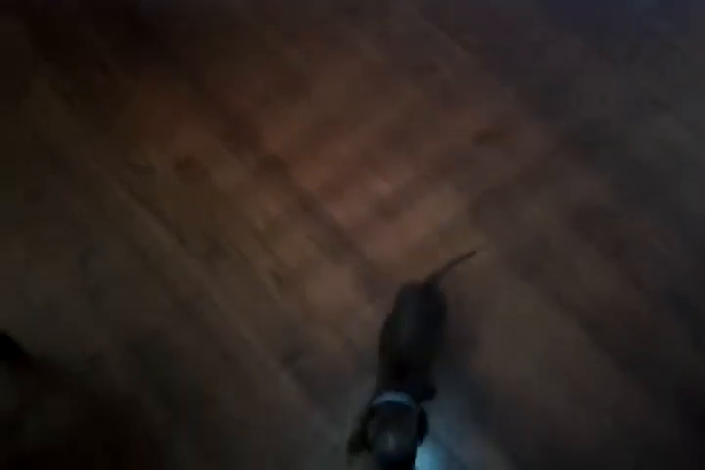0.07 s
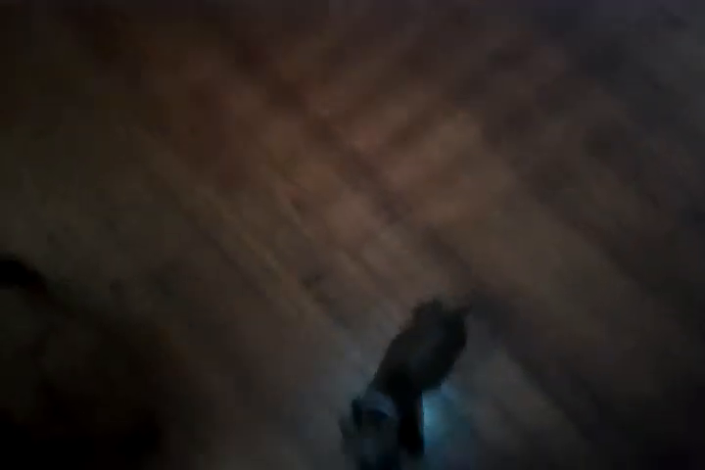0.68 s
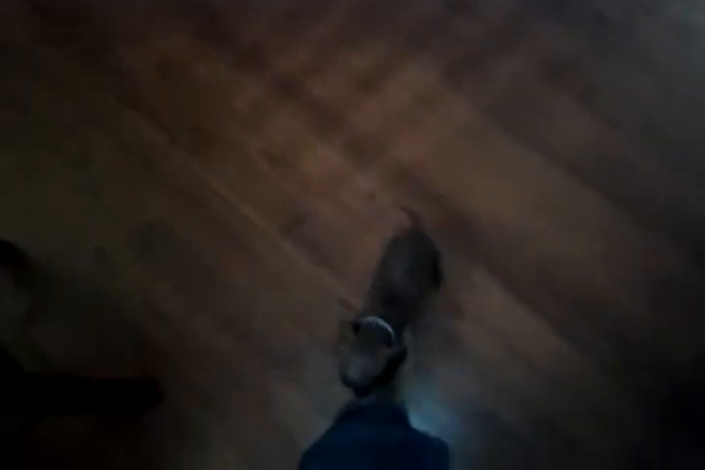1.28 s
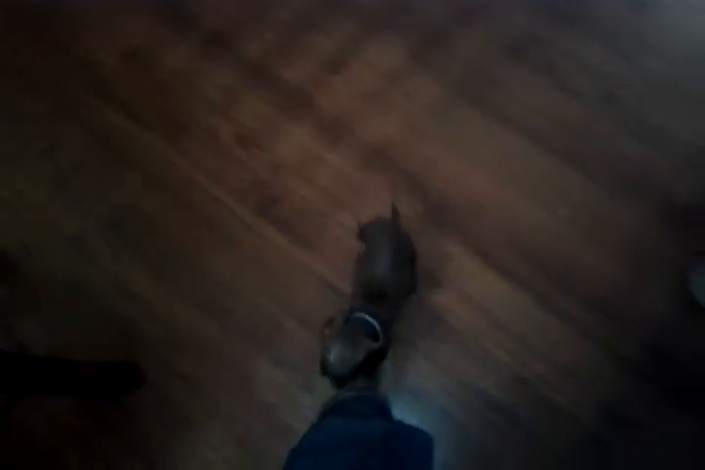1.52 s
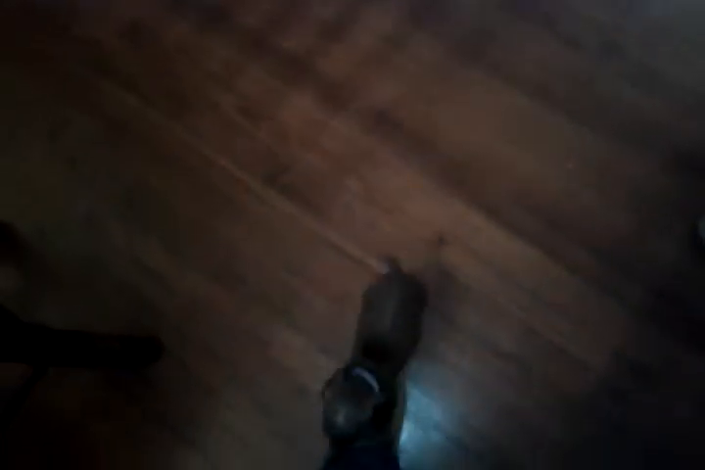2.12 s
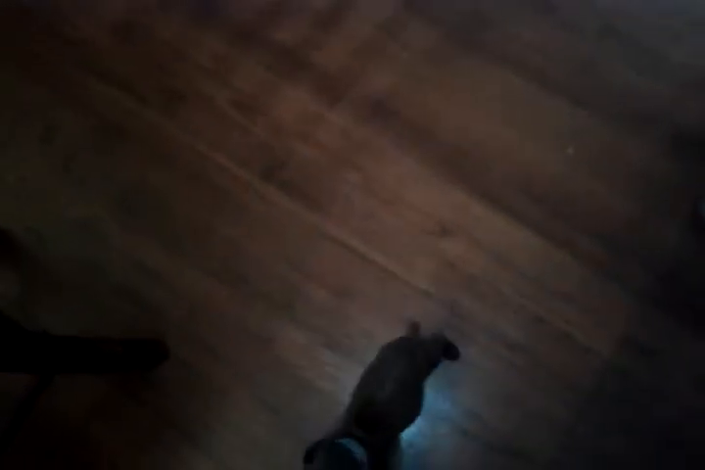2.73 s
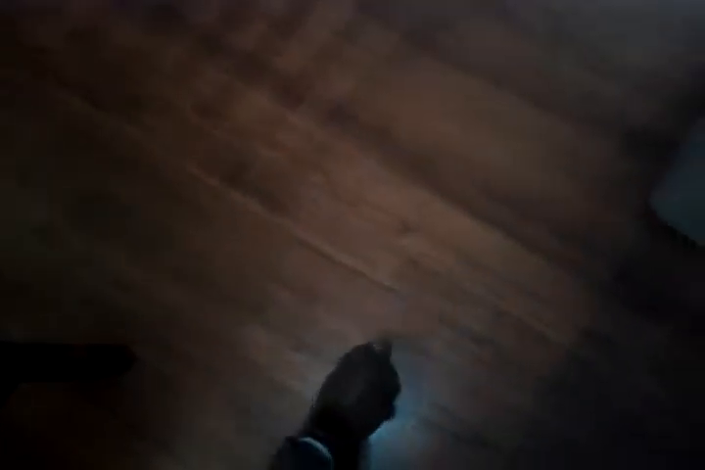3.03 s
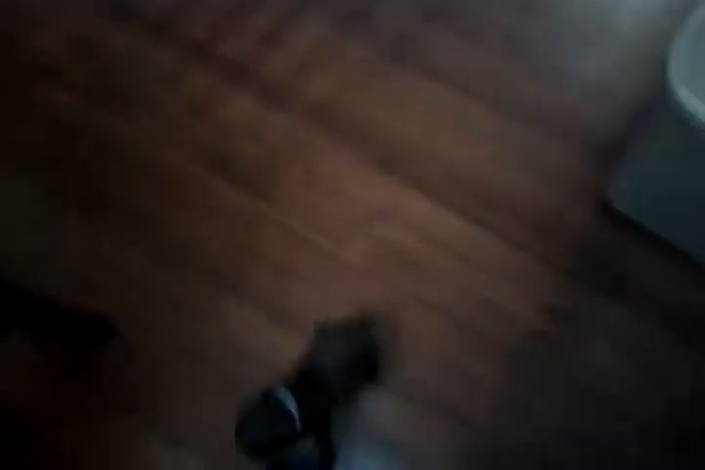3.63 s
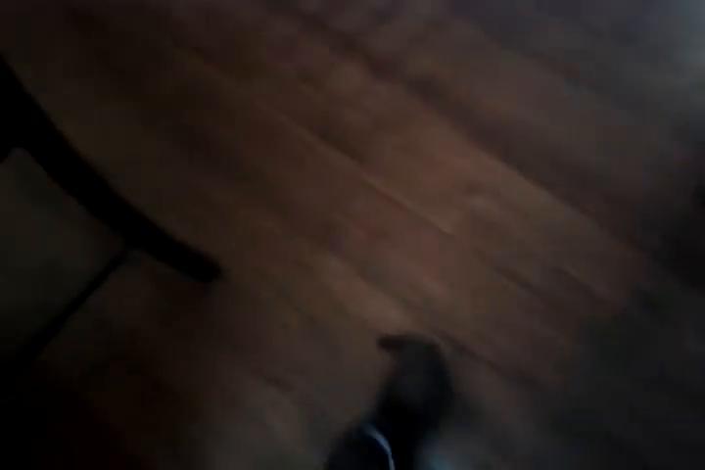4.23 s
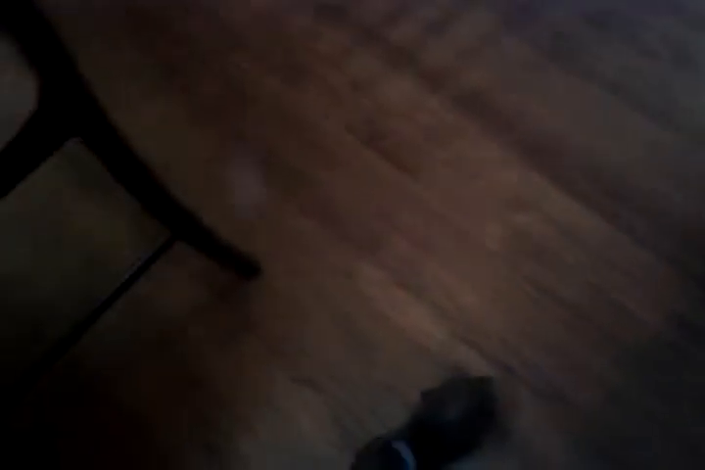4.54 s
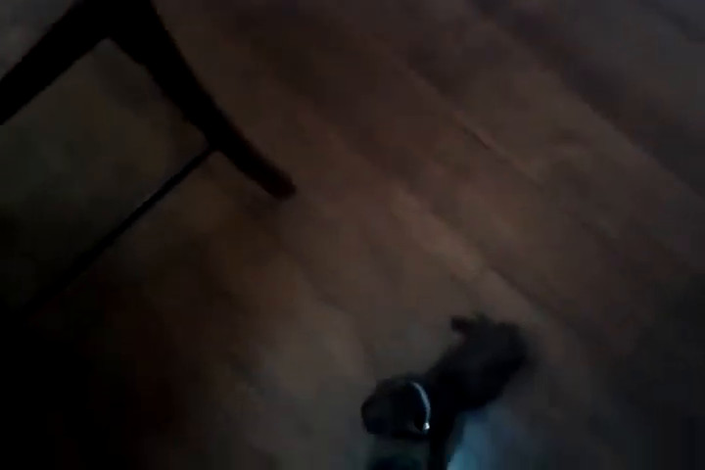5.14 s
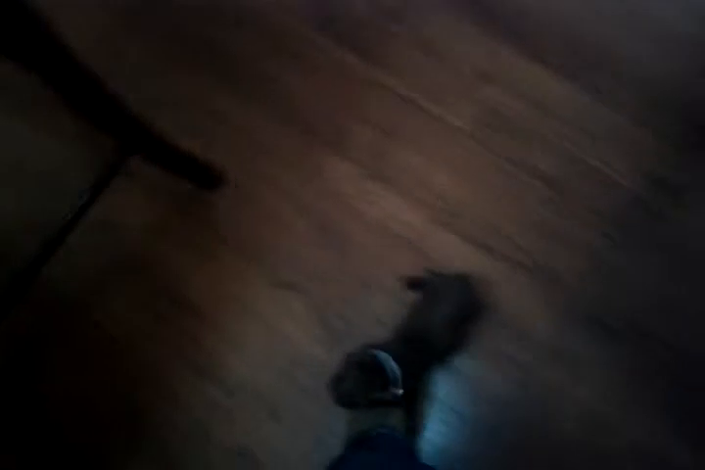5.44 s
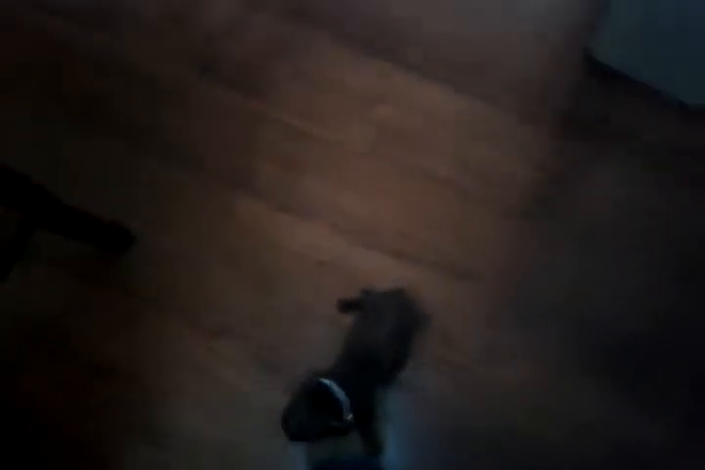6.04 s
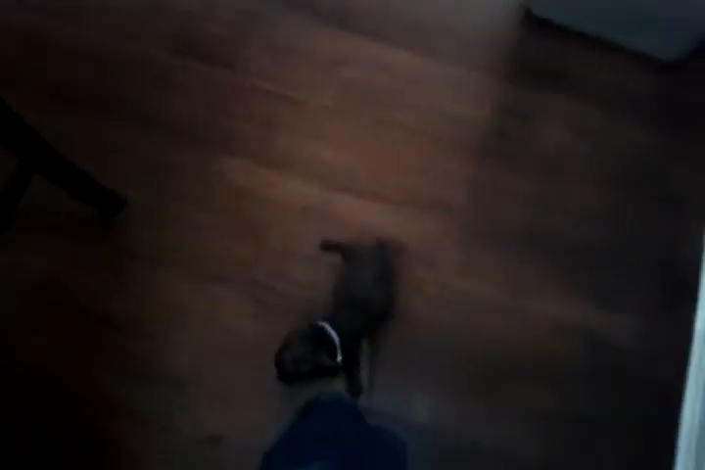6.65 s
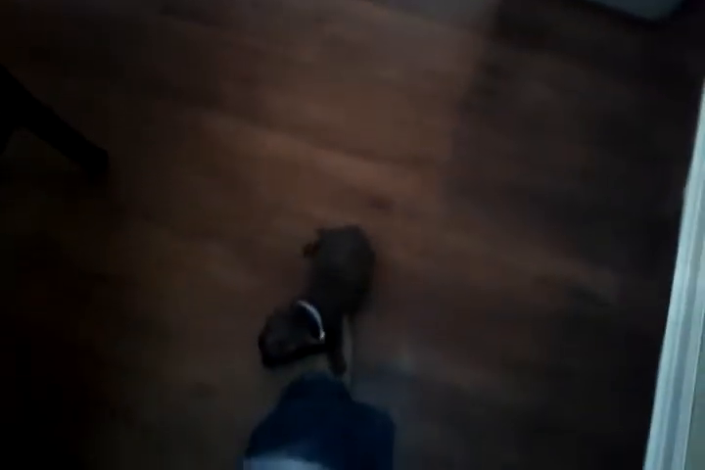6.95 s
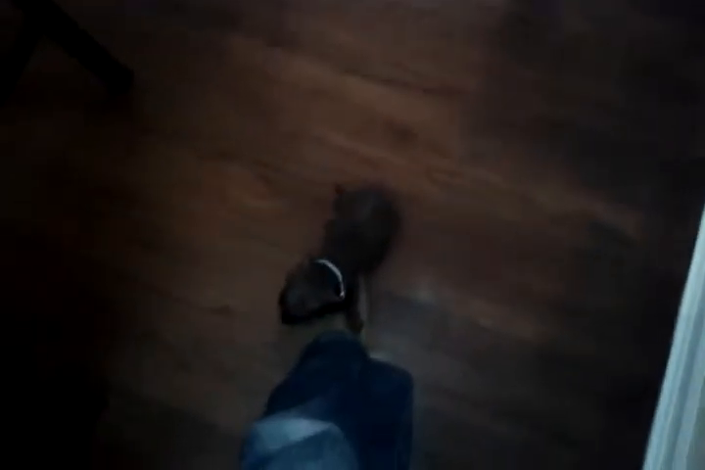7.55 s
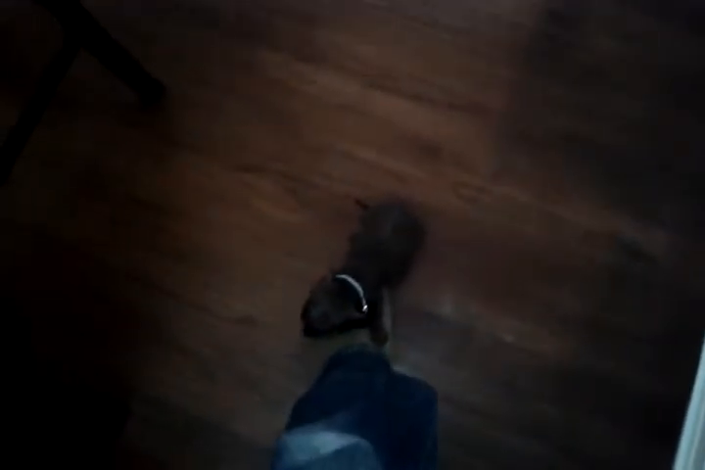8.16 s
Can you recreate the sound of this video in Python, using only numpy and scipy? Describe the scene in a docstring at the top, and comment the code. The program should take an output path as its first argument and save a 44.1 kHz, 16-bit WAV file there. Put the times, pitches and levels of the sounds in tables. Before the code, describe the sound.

A slipper slides over a hardwood floor from the start, dragged in uneven pulls with a puppy hanging on. Each pull is a soft hiss over a low rumble from the boards. A light scuff leads into a hard, chirping one at about 0.9 seconds. Longer slides follow from 1.2 to 2.7 seconds, then another light and hard scuff pair around 3 to 3.2. One sharp knock rings the wood at 3.5. Sliding resumes until about 4.8, then goes faint. The third hard scuff lands near 6 seconds, followed by brief groans of the sole and softer drags until 7.4, with a last small slide near 8.3. Claws and teeth click now and then, most clearly around 1.1, 4.1 and 6.6 seconds. The room is quiet, with a short reverberation, low steady noise and a faint electrical hum.

```python
"""A slipper's sole hisses over a hardwood floor, dragged in stages with a puppy hanging on.
Sliding friction, a crowd of tiny slips, makes the hiss and drives a rumble in the boards.
The sole scuffs hard three times, each after a lighter scuff, and briefly groans or chirps.
Claws and teeth click now and then, and one sharp knock rings the modes of the boards.
The quiet room adds a short reverberation, steady noise and a faint mains hum."""
import sys
import numpy as np
from scipy import signal
from scipy.fft import rfft, irfft, next_fast_len
from scipy.io import wavfile

SR = 44100
rng = np.random.default_rng(int(sys.argv[2]) if len(sys.argv) > 2 else 0)


def put_to_file(sound):
    """Save the sound as 16-bit audio at rate SR, in the file named by the first command-line argument."""
    columns = np.atleast_2d(sound).T  # one column per channel
    safe = np.clip(columns, -1, 1)
    whole_steps = np.round(safe * 32767)
    wavfile.write(sys.argv[1], SR, whole_steps.astype(np.int16))


N = 370440


# Spectra of the sliding sole and of the boards under it.
# Each row: frequency in Hz, relative spectral density in dB.
HISS_SPECTRUM = [(300, -39), (900, -17), (1500, -0.5), (2100, -0.5), (3000, -2), (3750, -2.5), (4400, -5),
                 (5500, -4), (6500, -9), (7400, -10), (9000, -16)]
RUMBLE_SPECTRUM = [(60, -27.5), (150, -6.5), (300, -3), (620, 2), (780, 1.5), (980, 2), (1300, -3),
                   (2000, -21), (5000, -52.5)]

def pull(rise_s, fall_s, rumble_db, sole_hz, width_hz, ring_db, tilt_db):
    """Sliding friction: hiss and rumble grow as powers of the speed, which rises and falls to rest."""
    t = np.arange(0, rise_s + fall_s, 1 / SR)
    arch = np.sin(np.pi / 2 * np.interp(t, [0, rise_s, rise_s + fall_s], [0, 1, 0]))
    waver_db = 0.5 * drift(len(t), rate_hz=7.1)
    speed = arch * amp(waver_db)
    rub = slips(len(t), per_s=16000, spread_db=1.0, judder_db=0.5)
    hiss = unit(colour(rub, HISS_SPECTRUM, tilt_db))
    ring = amp(ring_db) * ringing(len(t), sole_hz, width_hz)
    rumble = amp(rumble_db) * unit(colour(rub, RUMBLE_SPECTRUM))
    return speed ** 0.93 * unit(hiss + ring) + speed ** 0.86 * rumble


# Pulls on the slipper. Each row: fastest moment, rise time and fall time in seconds, hiss level in dB,
# rumble over hiss in dB, the sole's resonance and its width in Hz, ring over hiss in dB,
# treble tilt in dB per octave.
SLIPPER_PULLS = [ (0.04, 0.12, 0.46, -41.5, -12.5, 2750, 1300, -2.5, 1.5),
                 (0.33, 0.12, 0.11, -43, -13.5, 3200, 1690, -1.5, -0.3),
                 (0.85, 0.46, 0.55, -57, -5, 2450, 700, -7, 2.5),
                 (1.56, 0.47, 0.51, -41.5, -10.5, 2450, 750, -4, -0.7),
                 (1.96, 0.32, 0.49, -43.5, -10, 2910, 800, -4.5, -0.2),
                 (2.46, 0.14, 0.26, -46, -5.5, 2240, 900, -4, 0),
                 (2.85, 0.30, 0.43, -60, -5.5, 2260, 800, -4.5, 1.8),
                 (3.38, 0.10, 0.14, -56, -4, 2300, 900, -5, 2.5),
                 (3.78, 0.24, 0.48, -44, -4.5, 2370, 900, -8, -0.8),
                 (4.17, 0.21, 0.13, -48.5, -3, 2340, 900, -5, -0.5),
                 (4.61, 0.32, 0.18, -53, -3, 2280, 800, -4.5, 0.2),
                 (5.62, 1.10, 0.63, -61.5, -6, 2180, 700, -4.5, 3),
                 (6.15, 0.12, 0.3, -56.5, -4.5, 2150, 600, -3.5, 3.5),
                 (6.35, 0.092, 0.24, -45, -5.5, 2170, 700, -0.5, 2),
                 (6.76, 0.22, 0.17, -46.5, -3.5, 2120, 900, -3, 1),
                 (7.08, 0.21, 0.36, -50, -5, 2150, 850, -3, 1.5),
                 (8.38, 0.26, 0.12, -51, -3, 2220, 900, -6, -0.5)]

def slide():
    """Superposition: the pulls add up, one often running into the next."""
    out = np.zeros(N + SR)  # a second of lead-in: the first pull is already under way
    for fastest, rise_s, fall_s, db, *contact in SLIPPER_PULLS:
        add(out, 1 + fastest - rise_s, amp(db) * pull(rise_s, fall_s, *contact))
    return out[SR:]


# Spectra of the sole's edge touching down and of a hard scuff.
# Each row: frequency in Hz, relative spectral density in dB.
EDGE_SPECTRUM = [(60, -12.5), (250, -5.5), (700, -3), (1200, -10), (1750, -6), (2280, 1.5), (3100, -5.5),
                 (3650, -2.5), (4300, -8.5), (5800, -4), (7300, -8), (9000, -11.5)]
SCUFF_SPECTRUM = [(60, -35.5), (150, -12), (300, -8), (800, -3), (1300, -2), (2000, 1.5), (3000, 3),
                  (3700, -2), (4300, -5), (5100, -1.5), (6100, -4.5), (7100, -4), (9000, -13.5)]
# Scuffs of the sole. Each row: touch-down and fastest moment in seconds, drag and peak levels in dB,
# Gaussian half-length in seconds, the sole's resonance in Hz, ring over rub in dB,
# treble tilt in dB per octave.
SOLE_SCUFFS = [ (0.658, 0.685, -57.5, -44, 0.015, 2700, -5.5, -1.5),
               (0.838, 0.92, -41.5, -28.5, 0.017, 2550, -5, 0.5),
               (2.945, 2.992, -53, -46.5, 0.018, 1270, -5.5, -1.5),
               (3.143, 3.225, -40.5, -31, 0.018, 1560, -9, 0.6),
               (5.645, 5.697, -58, -44.5, 0.011, 2150, -0.5, -3.5),
               (5.865, 5.98, -43, -30, 0.018, 2250, 3, -0.8)]

def scuffs():
    """Transient friction: the sole's edge drags lightly, then is wrenched along in one quick swell."""
    out, t = np.zeros(N), np.arange(SR // 3) / SR
    for touch, fastest, drag_db, peak_db, half_s, sole_hz, ring_db, tilt_db in SOLE_SCUFFS:
        edge_slips = slips(len(t), per_s=20000, spread_db=0.5, judder_db=2.5)
        edge = unit(colour(edge_slips, EDGE_SPECTRUM, tilt_db))
        sole_slips = slips(len(t), per_s=22000, spread_db=1, judder_db=1.1)
        rub = unit(colour(sole_slips, SCUFF_SPECTRUM, tilt_db))
        ring = amp(ring_db) * ringing(len(t), sole_hz, width_hz=620)
        past_peak = t - (fastest - touch)
        attack = np.minimum(t / 0.0013, 1)
        drag = amp(drag_db) * attack * np.exp(-np.maximum(past_peak, 0) / 0.055)
        swell = amp(peak_db) * np.exp(-.5 * (past_peak / half_s) ** 2)
        add(out, touch, drag * edge + swell * unit(rub + ring))
    return out


# Catches of the sole. Each row: centre and Gaussian half-length in seconds, pitch in Hz, level in dB.
SOLE_GROANS = [(0.918, 0.043, 287, -53), (0.922, .018, 3300, -38.5), (3.004, 0.012, 1120, -50),
               (3.227, 0.013, 1240, -42.5), (3.224, 0.013, 2700, -46), (3.922, 0.012, 400, -50.5),
               (5.878, 0.012, 3540, -47), (5.922, 0.011, 2280, -44), (5.963, 0.0084, 3800, -37),
               (6.353, 0.018, 238, -53), (6.355, 0.023, 395, -53.5), (6.43, 0.02, 995, -48)]

def groans():
    """Stick-slip motion: friction gathers round one pitch for a moment, as a groan or a chirp."""
    out, t = np.zeros(N), np.arange(SR // 5) / SR
    for centre, half_s, hz, db in SOLE_GROANS:
        swell = amp(db) * np.exp(-.5 * ((t - t.mean()) / half_s) ** 2)
        add(out, centre - t.mean(), swell * ringing(len(t), hz, width_hz=0.27 * hz))
    return out


# Resonances of the rubbed floor. Each row: frequency in Hz, width in Hz, gain in dB.
FLOOR_RESONANCES = [(282, 8.6, -1.5), (417, 16, -13), (610, 4.6, -17), (980, 19, -14), (1835, 11, -17.5),
                    (2320, 30, -10), (2490, 22, -4.5)]

def floor(rub):
    """Forced vibration: the planks ring along with the rubbing that drives them."""
    return rub + sum(amp(db) * resonate(rub, hz, width_hz) for hz, width_hz, db in FLOOR_RESONANCES)


# Modes of the struck boards. Each row: frequency in Hz, relative level in dB, 60 dB decay in seconds.
BOARD_MODES = [(131, -37, .16), (285, -35, .16), (416, -11, 0.075), (606, -20, 0.088), (983, -5, .045),
               (1115, 4.5, 0.024), (1620, -21, .02), (1930, 14, 0.014), (2040, 1, .02), (2340, -1, 0.018),
               (3150, -15, .015), (4300, -20, .012)]
# The knock lands on an edge, then flat, and settles. Each row: start in seconds, relative level in dB.
KNOCK_CONTACTS = [(3.5395, -17.5), (3.5412, -5.5), (3.5461, -17), (3.5531, -24)]

def knock():
    """Modal ringing: a blow sets the boards vibrating, and the room adds a short diffuse tail of noise."""
    out, t = np.zeros(N), np.arange(SR // 3) / SR
    ring = sum(amp(db - 60 * t / t60) * np.sin(2 * np.pi * hz * t) for hz, db, t60 in BOARD_MODES)
    ring /= abs(ring).max()
    for start, db in KNOCK_CONTACTS:
        add(out, start, amp(db) * ring)
    burst = rng.standard_normal(len(t)) * np.exp(-t / 0.028)
    rattle = colour(burst, [(50, -40), (130, -6), (350, 3), (700, -6), (1100, 0), (1900, -6),
                            (2500, 4), (3400, -12), (5000, -14), (8000, -22.5)])
    add(out, KNOCK_CONTACTS[0][0], amp(-39) * unit(rattle))
    # narrow boards radiate little bass
    radiation = [(20, -30), (60, -22), (130, 0.5), (240, -1), (400, 3), (3000, -1.5), (8000, -4.5)]
    return colour(out, radiation)


# Spectrum of a click. Each row: frequency in Hz, relative spectral density in dB.
CLICK_SPECTRUM = [(80, -24), (300, 0.5), (900, 3.5), (1400, 2), (2200, 3.5), (3200, -4.5), (4500, -8.5),
                  (7000, -11.5), (9000, -21)]
# Claws and teeth. Each row: time in seconds, relative level in dB, treble tilt in dB per octave.
CLAW_AND_TOOTH_CLICKS = [(0.523, -41, 4.5), (0.819, -37.5, -3.5), (0.845, -29, -2.5), (1.062, -23, 3.5),
                         (1.080, -33, 4), (1.1767, -31.5, 3), (1.972, -37, 2), (3.369, -40, 1.5),
                         (4.053, -25.5, 1.5), (4.516, -34.5, 5), (4.623, -34.5, -3), (5.254, -47, -4),
                         (5.466, -47, -1), (5.663, -40, 4), (6.626, -32, -0.5), (7.029, -41, 8),
                         (8.130, -40, 0.5), (8.195, -35, 0.5)]

def clicks():
    """Impact noise: each contact of claw or tooth is a broadband burst that dies in milliseconds."""
    out, t = np.zeros(N), np.arange(SR // 20) / SR
    for when, db, tilt_db in CLAW_AND_TOOTH_CLICKS:
        burst = rng.standard_normal(len(t)) * np.exp(-t / 0.0031)
        tick = colour(burst, CLICK_SPECTRUM, tilt_db)
        add(out, when - .0008, amp(db - 19.5) * unit(tick))
    return out


# Reverberation times of the room. Each row: frequency in Hz, 60 dB decay in seconds.
REVERB_TIMES = [(150, 0.75), (530, 0.57), (1400, 0.42), (3500, 0.33), (8000, 0.24)]

def room(x):
    """Reverberation: sparse reflections off floor and walls, each band dying at its own rate."""
    t = np.arange(SR // 2) / SR
    polarity = rng.choice([-1., 1.], len(t))
    arrivals = (rng.random(len(t)) < 3000 / SR) & (t > .004)  # 3000 a second, after a 4 ms gap
    hz, when, bands = signal.stft(polarity * arrivals, SR, nperseg=256)
    decay = amp(-60 * when / curve_at(REVERB_TIMES, hz)[:, None])
    tail = signal.istft(bands * decay, SR, nperseg=256)[1]
    return signal.fftconvolve(x, tail / np.linalg.norm(tail))[:N]


# Spectrum of the quiet room. Each row: frequency in Hz, relative spectral density in dB.
AIR_SPECTRUM = [(20, -30.5), (50, -7), (100, -0.5), (200, -1.5), (400, -3.5), (700, -7), (1200, -9),
                (2200, -12), (4000, -16), (7000, -18), (9000, -28)]

def air(noise_db=-59.5, hum_hz=119, hum_db=-70.5):
    """Ambient noise: a steady rush, with a faint mains hum that wavers by phase modulation."""
    t = np.arange(N) / SR
    hum = np.sqrt(2) * np.sin(2 * np.pi * hum_hz * t + .3 * drift(N, rate_hz=4.9))
    rush = unit(colour(rng.standard_normal(N), AIR_SPECTRUM))
    return amp(noise_db) * rush + amp(hum_db) * hum


def slips(n, per_s, spread_db, judder_db):
    """Shot noise of friction, rms 1: tiny slips of uneven size, stronger as the sole catches."""
    size = rng.standard_normal(n) * amp(spread_db * np.minimum(rng.exponential(1, n), 5))
    slipping = rng.random(n) < per_s / SR
    judder = amp(judder_db * drift(n, rate_hz=42))
    return unit(size * slipping * judder)


def ringing(n, hz, width_hz):
    """Narrowband noise, rms 1: two like resonators in cascade make one steep peak."""
    once = resonate(rng.standard_normal(n), hz, width_hz)
    return unit(resonate(once, hz, width_hz))


def resonate(x, hz, width_hz):
    """Damped resonance: a band round hz passes with a gain near 1."""
    carrier = np.exp(2j * np.pi * hz * np.arange(1, len(x) + 1) / SR)
    pole = np.exp(-np.pi * width_hz / SR)
    envelope = signal.lfilter([1 - pole], [1, -pole], x / carrier + 1e-18)
    return 2 * (carrier * envelope).real


def drift(n, rate_hz):
    """Random modulation: noise low-passed at rate_hz, with an rms near 1."""
    size = next_fast_len(n + SR)
    hz = np.fft.rfftfreq(size, 1 / SR)
    spectrum = rfft(rng.standard_normal(size)) / (1 + (hz / rate_hz) ** 4)
    return unit(irfft(spectrum, size))[:n]


def colour(x, points, tilt_db=0):
    """Minimum-phase filtering by (Hz, dB) points, tilted by tilt_db per octave above 400 Hz."""
    hz = abs(np.fft.fftfreq(4096, 1 / SR))
    octaves = np.log2(np.maximum(hz, 400) / 2500)  # from the middle of the friction band
    log_gain = np.log(amp(curve_at(points, hz) + tilt_db * octaves))
    response = np.exp(np.conj(signal.hilbert(log_gain)))
    taps = np.fft.ifft(response).real
    return signal.oaconvolve(x, taps[:len(taps) // 2])[:len(x)]


def curve_at(points, hz):
    """Interpolation on a log-frequency axis."""
    point_hz, values = np.transpose(points)
    return np.interp(np.log(hz + 1), np.log(point_hz + 1), values)


def amp(db):
    """Decibels as an amplitude ratio."""
    return 10 ** (np.asarray(db) / 20)


def unit(x):
    """Normalisation to rms 1."""
    return x / np.sqrt(np.mean(x ** 2) + 1e-20)


def add(mix, start_s, sound):
    """Superposition of a sound on the mix from start_s."""
    part = mix[round(start_s * SR):][:len(sound)]
    part += sound[:len(part)]


def scene():
    """Direct and reverberant fields: slipper, clicks and knock add to their echoes and the room noise."""
    drag = floor(slide())
    scuff = floor(scuffs()) + groans()
    click, blow = clicks(), knock()
    echoes = room(amp(-12) * drag + amp(-9) * scuff + amp(-2.5) * click + amp(-9.5) * blow)
    return (drag + scuff + click + blow + echoes + air())[None]


# Frequency response of a small microphone. Each row: frequency in Hz, gain in dB.
MIC_RESPONSE = [(20, -1.5), (7200, 1), (7800, -1.5), (8300, -7.5), (8800, -19), (9100, -34)]

def record(dry, cutoff_hz=9000):
    """Band limiting: a small microphone loses the top treble, and a steep low-pass follows."""
    heard = colour(dry[0], MIC_RESPONSE)
    low_pass = signal.firwin(511, cutoff_hz, window=("kaiser", 9), fs=SR)
    return signal.oaconvolve(heard, low_pass, "same")[None]


dry = scene()
out = record(dry)
put_to_file(out)
```